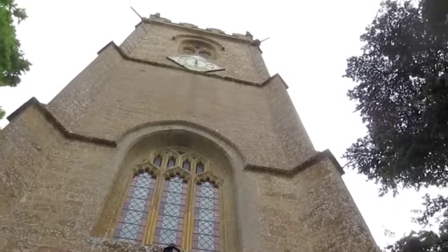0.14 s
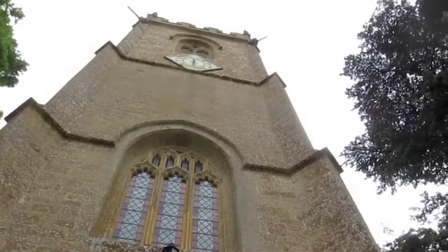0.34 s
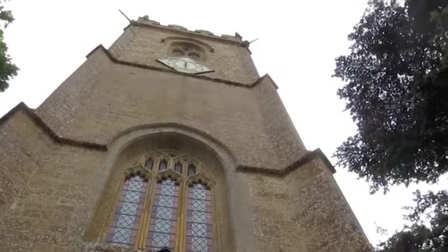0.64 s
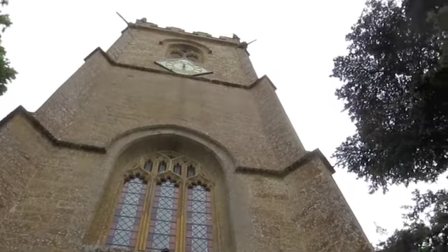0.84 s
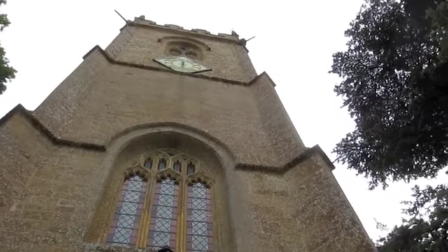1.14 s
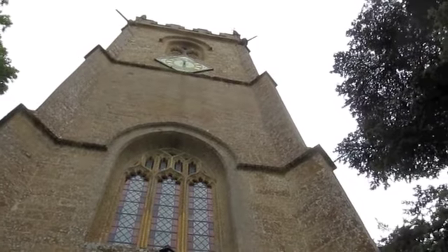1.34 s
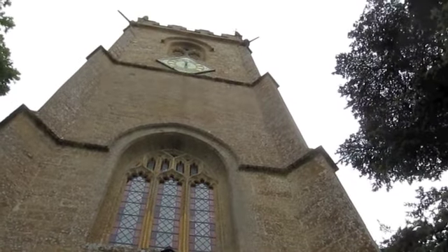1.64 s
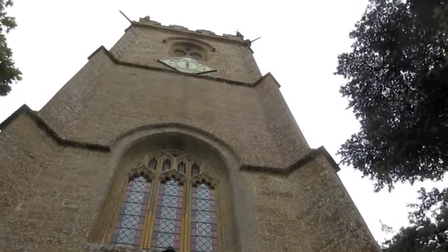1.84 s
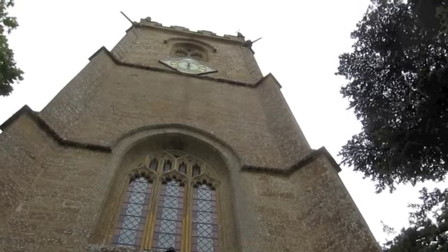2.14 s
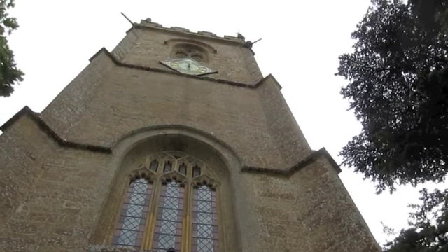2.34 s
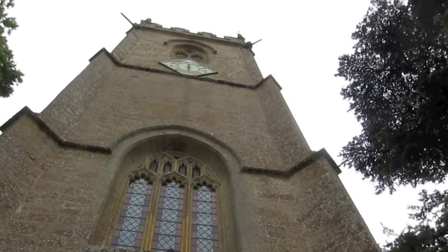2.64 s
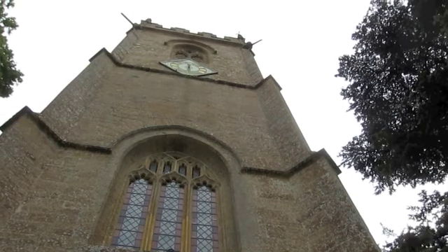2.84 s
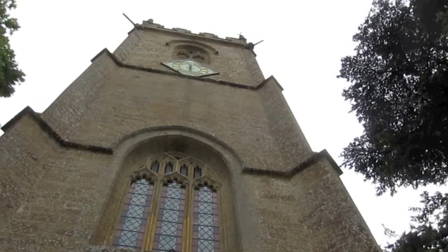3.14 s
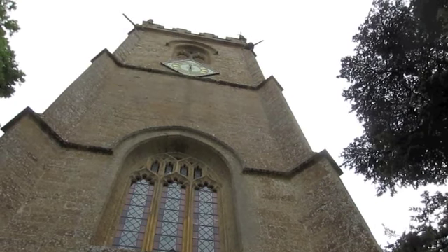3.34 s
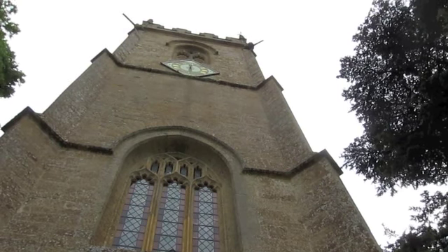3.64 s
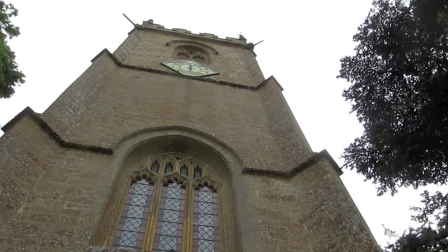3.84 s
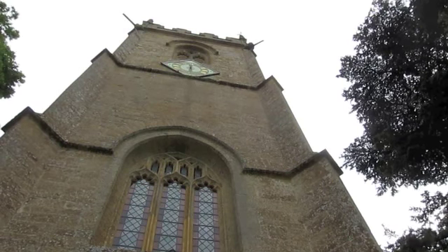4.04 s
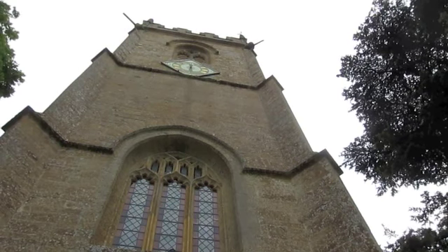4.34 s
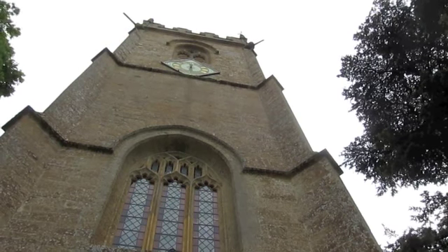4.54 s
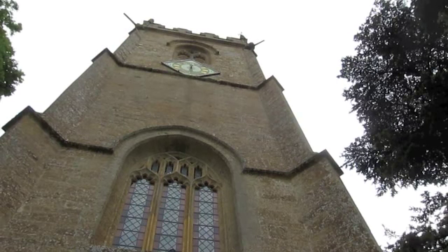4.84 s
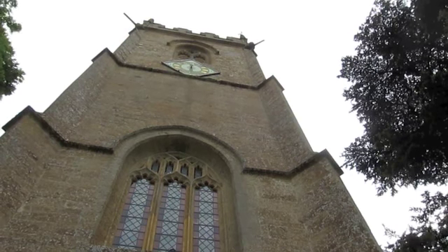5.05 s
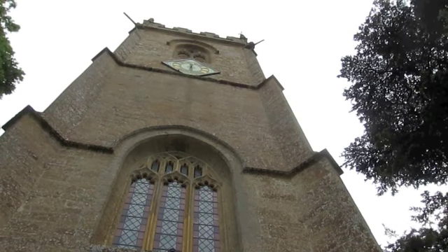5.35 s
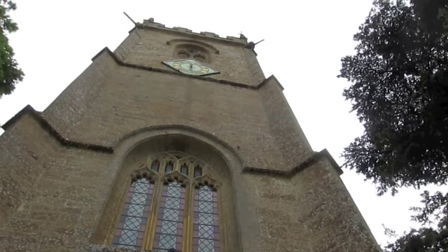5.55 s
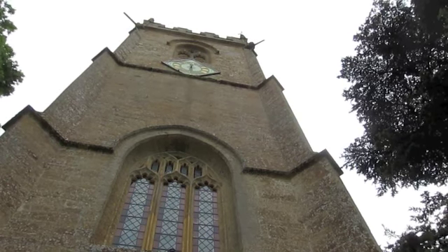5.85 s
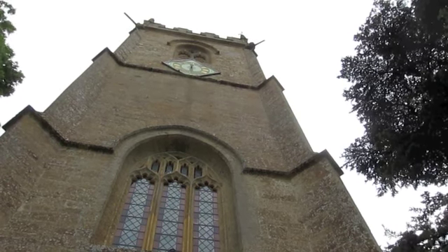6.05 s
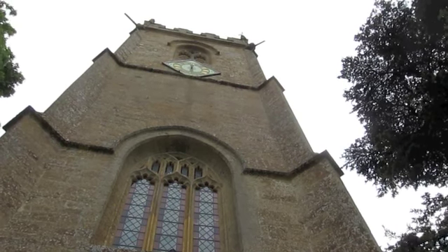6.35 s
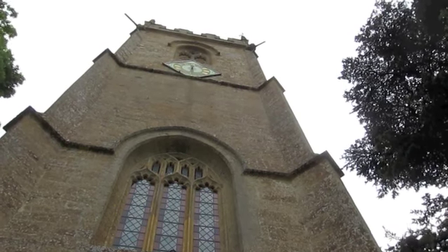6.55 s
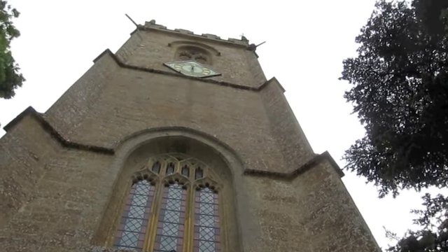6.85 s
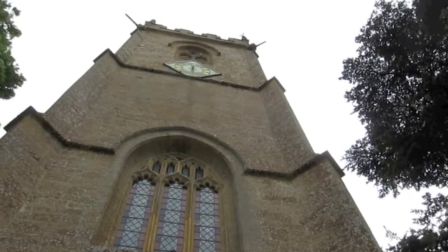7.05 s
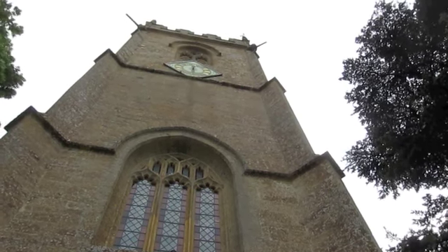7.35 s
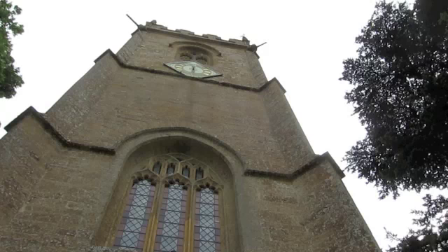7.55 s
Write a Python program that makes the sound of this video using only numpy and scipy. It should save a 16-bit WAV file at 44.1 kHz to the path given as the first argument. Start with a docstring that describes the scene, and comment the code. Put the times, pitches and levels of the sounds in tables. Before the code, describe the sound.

A churchyard beneath a stone bell tower, heard from the ground on a small stereo microphone. At 0 s the hum of an earlier stroke is still ringing, strongest around 470 Hz and gently wavering. Low, dull wind buffets bump the left and right sides at 0.1-0.2 s and again at 0.7-1 s. At about 0.95 s the clock hammer strikes: a sharp clang with a brief noisy crash off the stone, bright partials fading over a second or two into the long hum. The wind calms. The same bell sounds at 3.35 s, slightly stronger, and at 5.8 s, each with a softer hammer rebound about 0.2 s later. Gusts return from 5.4 s, thickest around 7.1-7.5 s. Distant traffic, leaves and light hiss form a quiet bed; faint, thin falling bird notes come after 4.2 s, clearest near 6.9 s. The hum is still sounding at the end, about 7.7 s.

```python
"""In a churchyard below a bell tower, on a gusty day, a clock hammer slowly strikes a bell.
The bell is split pairs of decaying sines that beat, the low ones ringing on from blow to blow;
shorter modes and a noisy crash join each blow. Wind is low noise and short pushes on two microphone ports.
Shaped noise makes the floor of far traffic, leaves and hiss; faint sliding sines make a small bird."""
import sys
import numpy as np
from scipy import signal
from scipy.io import wavfile

SR = 44100
rng = np.random.default_rng(int(sys.argv[2]) if len(sys.argv) > 2 else 0)


def how_loud(loudness_db):
    """Turn decibels into a plain amplitude multiplier (0 dB gives 1, 20 dB gives 10)."""
    steps = np.asarray(loudness_db, float) / 20
    return 10 ** steps


def wav_record(signal):
    """Record a signal, one row per channel, as 16-bit PCM in the file named by sys.argv[1]."""
    frames = np.transpose(np.atleast_2d(signal))
    bounded = np.clip(frames, -1, 1)
    # unit amplitude maps onto the largest positive 16-bit level
    quanta = np.round(bounded * 32767).astype(np.int16)
    wavfile.write(sys.argv[1], SR, quanta)


N = 339570   # length in samples
STEP = 32   # samples between values of a slow control


def at_hz(points, hz, column=1):
    """Reads a spectrum on a log-frequency axis."""
    points = np.array(points)
    return np.interp(np.log(hz), np.log(points[:, 0]), points[:, column])


def drift(rate_hz, count=1):
    """Slow chance of spread 1: twice-smoothed noise, one value every STEP samples."""
    r = np.exp(-2 * np.pi * rate_hz * STEP / SR)
    noise = rng.standard_normal((count, N // STEP + 3002))
    slow = signal.lfilter([1], [1, -2 * r, r * r], noise)[:, 3000:]   # skips the settling
    return slow / slow.std(axis=1, keepdims=True)


def full(slow):
    """Stretches coarse controls to every sample."""
    return np.array([np.interp(np.arange(N) / STEP, np.arange(len(s)), s) for s in slow])


def band(x, low_hz, high_hz, order=2):
    """Butterworth band-pass."""
    return signal.sosfilt(signal.butter(order, [low_hz, high_hz], "band", fs=SR, output="sos"), x)


def ring(clicks, hz, t60):
    """Two-pole resonator: a unit click sets a sine of height 1 ringing, down 60 dB after t60 seconds."""
    r, w = how_loud(-60 / (t60 * SR)), 2 * np.pi * hz / SR
    return signal.lfilter([0, np.sin(w)], [1, -2 * r * np.cos(w), r * r], clicks + 1e-18)


# Blows of the hammer, the first three before the start; they also drive the modes and the crash.
# Each row: start in seconds, strength in dB, delay of the fall-back in seconds, fall-back strength in dB,
# landing spot as dB added to the twins above 600 Hz.
BLOWS = [(-6.30909, .8, .222, -1.9, 0), (-3.86491, .8, .222, -1.9, 0), (-1.47949, .8, .222, -1.9, 0),
         (.948, 0.01, .222, -.3, -4), (3.35503, 1.7, .22196, -2.4, .5), (5.78065, .4, .21896, -5, 3)]
# Split pairs of the bell.
# Each row: frequency in Hz, twin offset in Hz, t60 in seconds, build-up in seconds (9 ms at the least
# is played), twin left-right difference in dB, beat lag left-right in seconds.
PAIRS = [(188.19, .06, 60, .004, -.1, -.016), (402.89, .44, 28.7, .004, -8, -.3),
         (467.97, -.87, 20.9, .006, -.5, .002), (531.68, -1.1, 10.5, .023, .1, .003),
         (747.85, 1.8, 2.8, .004, .8, -.015), (929.88, -1.95, 1.02, .004, -.4, .05),
         (1103.51, .84, 2.1, .03, -1.7, .005), (1400.6, .12, 2.8, .004, -1, -.094),
         (1511.79, -3.41, 3.8, .004, 4.2, -.003), (1965.28, -2.7, 1.75, .004, -3.8, -.049),
         (2448.09, 3.33, 3.5, .1, .3, -.011), (2960.2, 5.56, 3.3, .022, -.1, .026),
         (3490, 1.99, 2.3, .004, 3, .042), (4031.6, 3.5, 2.5, .02, -3.2, -.05),
         (4581, 1.47, 2.3, .01, 4, .1), (5126, 10.56, 2.2, .009, -.5, .006),
         (5683.8, 1.49, 1.7, .056, -4.6, 0)]
# What a blow gives each pair, before blow strength and waver.
# Each row: level in dB, twin level against it in dB, time until the twins swell together in seconds,
# rebound in dB added to the fall-back strength, rebound lead in cycles, left-right difference in dB,
# left-right lead in radians.
STRUCK = [(-45, -5, 2.98, -5.5, -0.45, -1.1, 0), (-42, -20, 2.7, -1, -0.15, 2.7, 0.29),
          (-19.5, -8, -.04, -5, -.22, -1.36, .04), (-41.5, -7.5, 0.1, -18, -0.53, -0.4, 0),
          (-29, -8, -0.15, 4, .15, 2.3, 0.11), (-23.5, -11.5, -1.2, -25.5, 0.23, -1.3, .15),
          (-23, -13.5, 0.7, -6, .08, -2.4, 0.66), (-34, -2, -2.5, -16, -0.16, -0.4, -.14),
          (-18, -14, -1.4, -14.5, 0.33, -4.5, .4), (-19.5, -15, -0.5, -8, 0.079, -5, 0.26),
          (-25, -12, -0.5, -8, 0.18, -6.5, 1.1), (-33.5, -10, 1, -14.5, -.18, -4, 1.1),
          (-30, -12.5, 0.2, -9.5, 0.48, 0, 1.5), (-39.5, -8, 0.4, -12, -.14, -5, 1.6),
          (-37.5, -10, 1.9, -15, -0.26, -4, 0.98), (-42, -8, 0.3, -14, -0.14, -0.7, 0.71),
          (-39.5, -11.5, 0.9, -12, 0.16, -2, -0.019)]


def bell_pairs(waver_db=0.4, waver_rad=0.11):
    """Each pair is two decaying sines; blows and rebounds add to what still rings, in step or against it."""
    out = np.zeros((2, N))
    t = np.arange(N // STEP + 2) * STEP / SR
    side = np.array([[.5], [-.5]])   # left, right
    for (hz, twin_hz, t60, build, twin_pan, lag), struck in zip(PAIRS, STRUCK):
        level_db, twin_db, meet, rebound_db, cycles, pan_db, lead = struck
        swell = np.zeros((2, len(t)), complex)   # height and phase around hz
        for s, db, after, back_db, spot_db in BLOWS:
            rebound = how_loud(back_db + rebound_db) * np.exp(2j * np.pi * cycles)
            twin = how_loud(twin_db + spot_db * (hz > 600) + side * twin_pan)
            for at, gain in ((s, how_loud(db)), (s + after, rebound)):
                u = np.clip(t - at, 0, None)
                beat = 1 + twin * np.exp(2j * np.pi * twin_hz * (u - meet - side * lag))
                rise = 1 - np.exp(-u / max(build, .009))
                start_phase = np.exp(-2j * np.pi * hz * at)
                swell += gain * start_phase * rise * how_loud(-60 * u / t60) * beat
        air = drift(2.5, count=4) * hz / 1000   # waver grows with frequency
        swell = swell * how_loud(level_db + side * pan_db + waver_db * air[:2])
        swell = swell * np.exp(1j * (side * lead + waver_rad * air[2:]))
        turn = 2 * np.pi * (hz * np.arange(N) / SR + rng.random())
        out += full(swell.real) * np.cos(turn) - full(swell.imag) * np.sin(turn)
    return out


# Gusts, each on one port, before the wind's level trim and lumps.
# Each row: middle in seconds, half-width to 1/e in seconds, level in dB, port (0 left, 1 right).
GUSTS = [(.12, 0.085, -30, 0), (.22, 0.1, -34.5, 1), (.73, 0.14, -31.5, 1), (.9, 0.17, -32.5, 0),
         (1.2, .1, -43.5, 0), (3.47, 0.085, -53, 0), (3.47, 0.091, -57, 1), (4.95, 0.075, -49, 0),
         (5.55, 0.21, -44, 1), (6.07, 0.17, -36, 0), (6.59, 0.13, -35.5, 1), (7., .1, -40, 0),
         (7., 0.084, -39, 1), (7.24, 0.12, -30.5, 1), (7.32, 0.11, -31.5, 0), (7.5, .07, -34.5, 1),
         (7.62, 0.055, -46, 1)]
# Strongest buffets.
# Each row: middle in seconds, level in dB, frequency in Hz, port (cut to a whole number: 0 left, 1 right).
BUFFETS = [(.068, -26, 110, 0), (.137, -23, 96, 0), (.157, -25, 108, 1), (0.194, -13.5, 101, 0.99),
           (.743, -15, 107, 1), (.782, -17, 116, 0), (0.784, -19, 78, 1), (.86, -20, 119, 0),
           (.936, -15.5, 106, 0), (5.404, -24.5, 86, 1), (5.609, -26, 75, 1), (5.962, -23.5, 104, 0),
           (6.239, -20, 111, 0), (6.663, -30, 103, 1), (7.137, -24, 113, 1), (7.164, -23, 107, 1),
           (7.191, -22, 99, 1), (7.268, -19, 112, 1), (7.275, -19, 116, 0.038), (7.289, -23, 102, 0.99),
           (7.42, -19, 107, 0), (7.495, -17.5, 91, 0.99), (7.513, -17, 117, 1)]
CALM_DB = -54.5   # wind pressure between gusts, before the level trim
BUFFET_CYCLES = 0.64   # half-width of a buffet to 1/e, in cycles
# Chance buffets: rate per port on average, highest level over the untrimmed gust, middle frequency
SMALL_PER_S, SMALL_OVER_DB, SMALL_HZ = 9., 9.5, 99


def wind(lumpy_db=5.0, level_db=-3.0, snap_db=-8.0):
    """Turbulence at each port: lumpy low noise of its own, plus buffets as short pushes."""
    rumble = band(rng.standard_normal((2, N)), 45, 150)
    wide = band(rng.standard_normal((2, N)), 22, 260, order=3)
    noise = rumble + how_loud(-8) * wide
    t, gust = np.arange(N) / SR, np.full((2, N), how_loud(CALM_DB))
    for s, width, db, port in GUSTS:
        gust[int(port)] += how_loud(db) * np.exp(-((t - s) / width) ** 2)
    lumps = how_loud(lumpy_db * full(drift(12, count=2)))
    out = how_loud(level_db) * gust * lumps * noise / noise.std()
    pushes = [(s, how_loud(db), hz, int(port)) for s, db, hz, port in BUFFETS]
    for when, size, pitch, port in rng.random((200, 4))[:round(2 * SMALL_PER_S * N / SR)]:
        s, port = .04 + when * (N / SR - .08), round(port)
        height = gust[port, round(s * SR)] * how_loud(SMALL_OVER_DB - 7 * size)
        pushes.append((s, height, SMALL_HZ * (.7 + .6 * pitch), port))
    u = np.arange(-1500, 1500) / SR
    for (s, size, hz, port), turn in zip(pushes, rng.random(300)):
        push = np.exp(-(hz * u / BUFFET_CYCLES) ** 2) * np.cos(2 * np.pi * (hz * u + turn))
        edge = np.exp(-(250 * u) ** 2) * np.cos(2 * np.pi * (2.4 * hz * u + turn))
        middle = round(s * SR)
        out[port, middle - 1500:middle + 1500] += size * (push + how_loud(snap_db) * edge)
    return out


# Traffic, leaves and microphone hiss, before flicker and port trim.
# Each row: frequency in Hz, level in dB per Hz.
FLOOR = [(40, -73.5), (80, -73.5), (140, -77.5), (280, -76.5), (620, -74.5), (1250, -74), (1750, -80.5),
         (2700, -83), (4300, -89.5), (6500, -96.5), (9000, -104), (11000, -115), (13000, -117),
         (15000, -121)]
# The floor below 2500 Hz swells as traffic comes and goes. Each row: time in seconds, change in dB.
TRAFFIC = [(0, -1.5), (1.2, 0), (2.2, 0.5), (3., 1), (4., 1), (5., -0.5), (6., -0.5), (7., -1.),
           (7.7, -0.5)]
# Left-right likeness of the floor. Each row: frequency in Hz, likeness from -1 to 1.
LIKENESS = [(60, 0.86), (150, 0.71), (500, .9), (1100, .7), (2000, 0.41), (3300, -0.38), (5500, -.3),
            (9700, -0.18)]


def surroundings(patchy_db=0.63):
    """Half-octave bands of stereo noise, each with its own level, flicker and likeness."""
    out, edges = 0, 30 * 2 ** np.arange(0, 9.1, .5)
    swell_db = np.interp(np.arange(N) / SR, *np.transpose(TRAFFIC))
    white = rng.standard_normal((2, 2, N)) * np.sqrt(SR / 4)
    for k, (low, high) in enumerate(zip(edges, edges[1:])):
        mid, side = band(white[k % 2], low, high)   # neighbouring bands use separate noise
        hz = np.sqrt(low * high)
        alike = np.clip(at_hz(LIKENESS, hz), -1, 1)
        flicker_db = patchy_db * full(drift(4.6))[0]
        gain = how_loud(at_hz(FLOOR, hz) + swell_db * (hz < 2500) + flicker_db)
        out = out + gain * (np.sqrt(1 + alike) * mid + np.sqrt(1 - alike) * side * [[1], [-1]])
    return out * how_loud([[-.5], [.8]])


def hammer(spread_s, count):
    """Each blow from the start on reaches each port as a short swarm of echoes of random strength."""
    force = np.zeros((2, N))
    for s, db, *rebound in BLOWS[3:]:
        lags = rng.gamma(2.5, spread_s, (2, count))
        for port in range(2):
            arrivals = ((s + lags[port]) * SR).astype(int)
            np.add.at(force[port], arrivals, how_loud(db) * rng.standard_normal(count))
    return how_loud(0.76) * force / np.sqrt(count)


# Shorter single modes, before hammer force and port balance.
# Each row: frequency in Hz, level in dB, t60 in seconds.
SHORT_MODES = [(958, -33.5, 0.82), (1188, -37.5, 1.2), (1326, -43, .7), (1685, -48, 1.4), (1707, -34, .5),
               (1793, -36.5, 0.99), (2627, -48.5, 1.9), (2920, -42, 1.1), (3036, -46.5, 1.3),
               (3375, -46, 1.4), (3730, -44.5, 1), (3898, -43.5, 0.91), (4030, -45, 1.6), (4290, -53, 1.2),
               (4390, -44.5, .6), (4760, -48.5, 1.2), (5000, -53.5, .7), (5490, -48, 1.6), (5932, -58, 1.2),
               (6105, -56, 1.), (6223, -49.5, 1.2), (6270, -52, 0.5), (6900, -57.5, 1.2), (7052, -59, 1.1),
               (7316, -61, 0.46), (8100, -59.5, .5), (8667, -64, 0.65), (9000, -63, .9), (9200, -66.5, .55),
               (9800, -68, 0.82)]
# Clang of the dense upper modes, before chance, hammer force and port balance.
# Each row: frequency in Hz, level in dB, t60 in seconds.
CLANG = [(250, -48.5, .25), (600, -49.5, 0.25), (1190, -40.5, 0.54), (2500, -44, 0.67), (4500, -53, .5),
         (7000, -63.5, .4), (10000, -79, .3), (15000, -88.5, .15)]


def bell_modes(shared=.8, right_db=3.0):
    """Resonators for short single modes and a dense thicket of weak ones, all struck by the same blows."""
    modes = list(SHORT_MODES)
    for hz in np.geomspace(230, 15000, 110) * rng.uniform(0.98, 1.03, 110):
        modes.append((hz, at_hz(CLANG, hz) + rng.normal(0, 4), at_hz(CLANG, hz, column=2)))
    out = np.zeros((2, N))
    forces = [hammer(.004, count=12) for k in range(6)]
    for k, (hz, db, t60) in enumerate(modes):
        force = forces[k % 6]
        push = shared * force[0] + np.sqrt(1 - shared ** 2) * force   # the left swarm goes to both ports
        out += how_loud(db) * ring(push, hz, t60)
    return out * how_loud(right_db / 2 * np.array([[-1], [1]]))


# Noisy crash of the blow and its scatter off the stone.
# Each row: low edge in Hz, high edge in Hz, crack level in dB, tail level in dB, tail t60 in seconds.
CRASH = [(223, 390, -36, -40.5, 0.37), (490, 1100, -29, -34.5, 0.44), (1070, 2200, -21, -33, 0.43),
         (2220, 3500, -20, -39.5, 0.45), (3500, 5000, -31, -43, .4), (5060, 6500, -33.5, -48.5, .4),
         (6550, 10200, -47.5, -63.5, .3), (12000, 15500, -65, -84, .2)]


def crash(rise_s=0.0037, crack_s=0.017, shared=0.78):
    """Noise that jumps up at each blow, holds while the belfry echoes arrive, then dies band by band."""
    t, out = np.arange(N) / SR, 0
    since = np.min([np.where(t > s, t - s, 9.) for s, *rest in BLOWS], axis=0)   # seconds since last blow
    white = rng.standard_normal((3, N))
    white = shared * white[2] + np.sqrt(1 - shared ** 2) * white[:2]
    crack = np.exp(-(since / crack_s) ** 2)
    rise = (1 - np.exp(-since / rise_s)) ** 2
    for low_hz, high_hz, crack_db, tail_db, t60 in CRASH:
        noise = band(white, low_hz, high_hz, order=4)
        tail = how_loud(tail_db - 60 * since / t60)
        out = out + rise * (how_loud(crack_db) * crack + tail) * noise / noise.std()
    return out


# Thin, mostly falling bird notes, before warble and roughness.
# Each row: start in seconds, length in seconds, first pitch in Hz, last pitch in Hz, level in dB.
CHIRPS = [(4.217, .24, 7600, 7300, -67.5), (4.82, 0.24, 7450, 7250, -68), (5.55, 0.18, 7450, 7350, -68.5),
          (5.74, .04, 7600, 7700, -63), (6.22, 0.13, 7550, 7300, -73), (6.885, 0.16, 7360, 7100, -58.5),
          (7.56, .14, 7200, 7150, -71), (7.648, 0.055, 5250, 5250, -62)]


def bird(warble_hz=60., rough_db=5.0):
    """Faint sines that slide in pitch, blurred by distance and leaves as random warble and roughness."""
    out, shake = np.zeros((2, N)), full(drift(40, count=3))
    for s, length, from_hz, to_hz, db in CHIRPS:
        at = np.arange(round(s * SR), min(round((s + length) * SR), N))
        pitch = np.linspace(from_hz, to_hz, len(at)) + warble_hz * shake[2, at]
        tone = np.sin(2 * np.pi * np.cumsum(pitch) / SR) * np.hanning(len(at)) ** .5
        out[:, at] += how_loud(db + rough_db * shake[:2, at]) * tone
    return out


def scene():
    """Bell, wind, surroundings and bird."""
    return bell_pairs() + wind() + surroundings() + bell_modes() + crash() + bird()


def top_cut(x):
    """Nothing passes above the cut-off."""
    return signal.sosfilt(signal.butter(12, 15700, fs=SR, output="sos"), x)


def record(dry):
    """A band-stop filter leaves a gap in the treble near 11 kHz."""
    gap = signal.butter(2, [10300, 12100], "bandstop", fs=SR, output="sos")
    notched = signal.sosfilt(gap, dry)
    return top_cut(notched)


dry = scene()
out = record(dry)
wav_record(out)
```